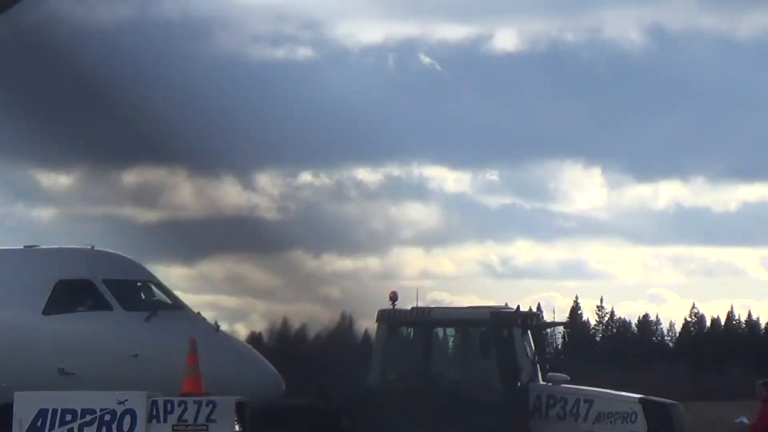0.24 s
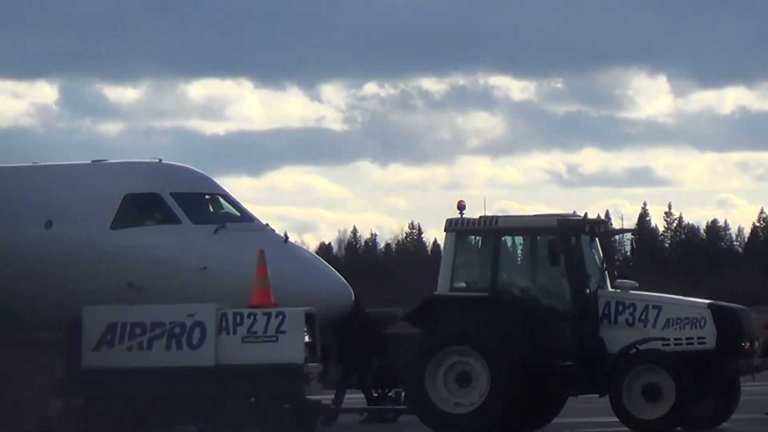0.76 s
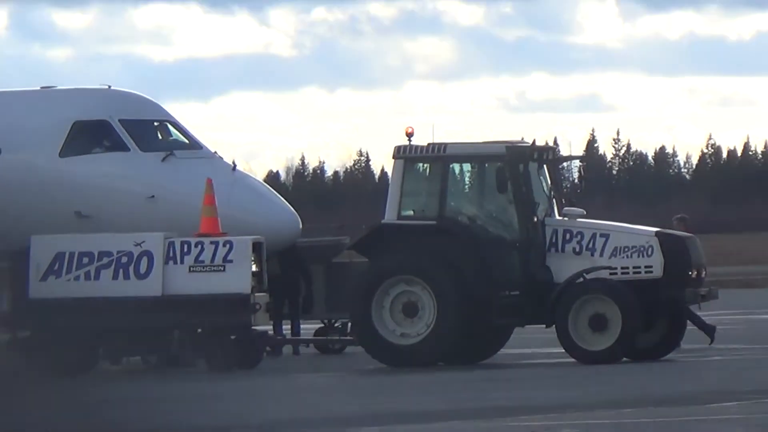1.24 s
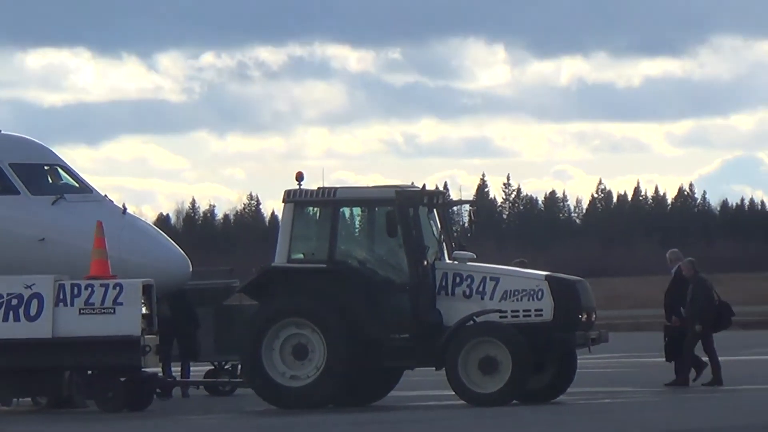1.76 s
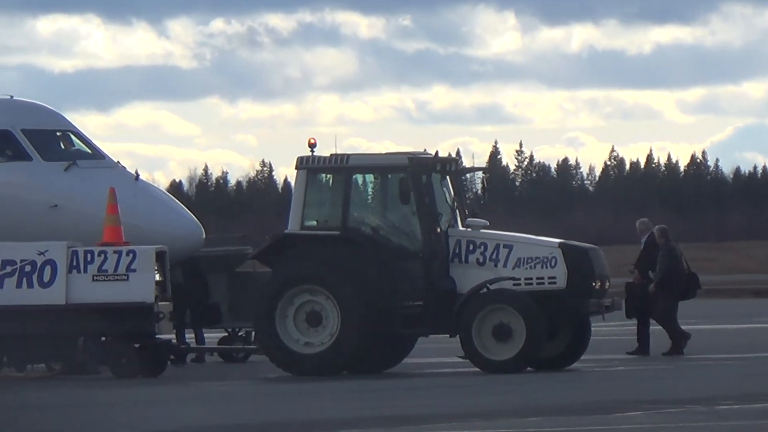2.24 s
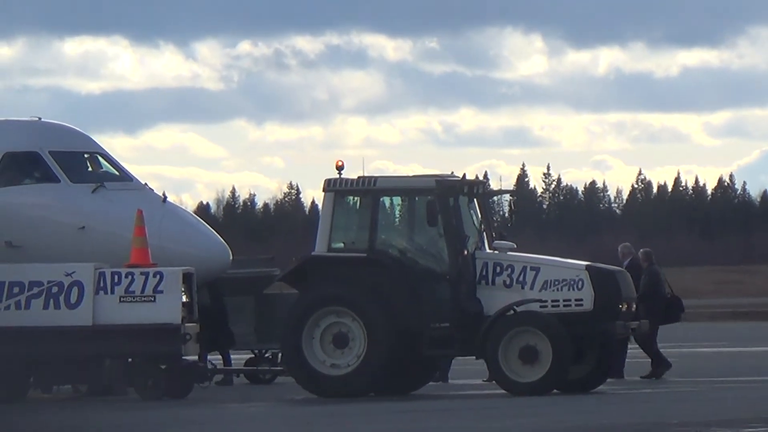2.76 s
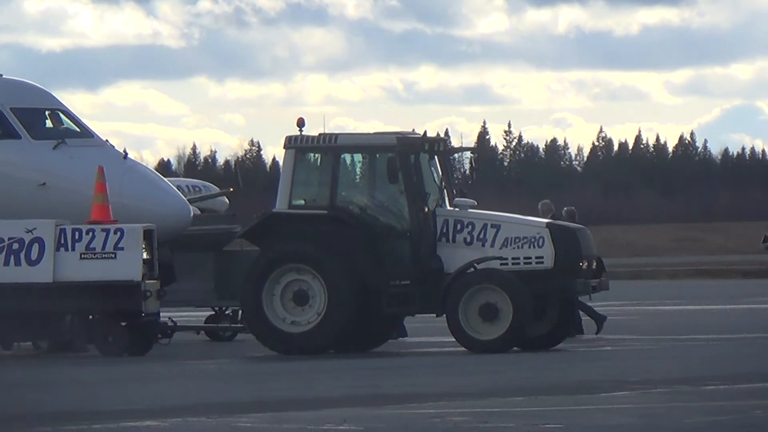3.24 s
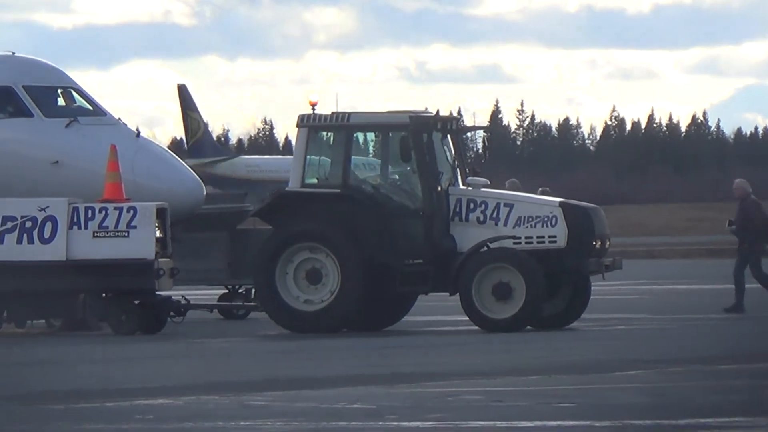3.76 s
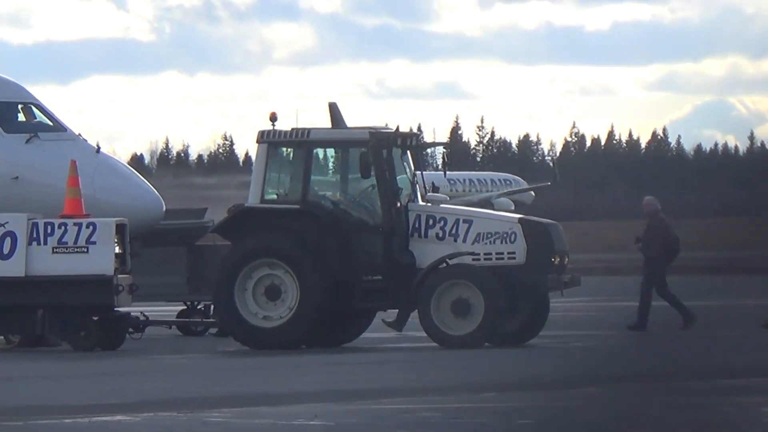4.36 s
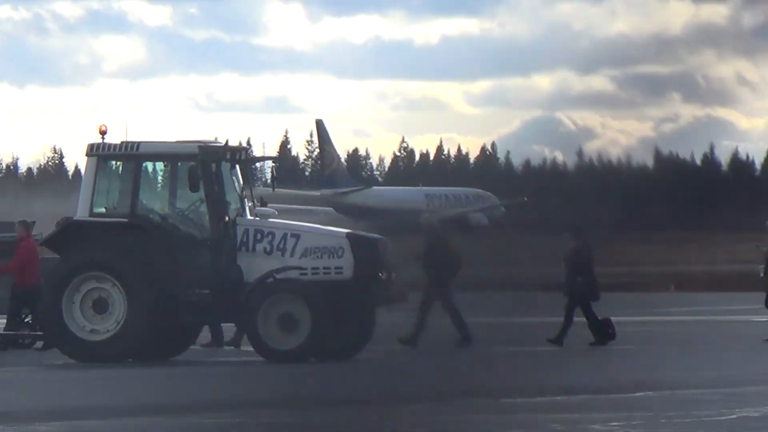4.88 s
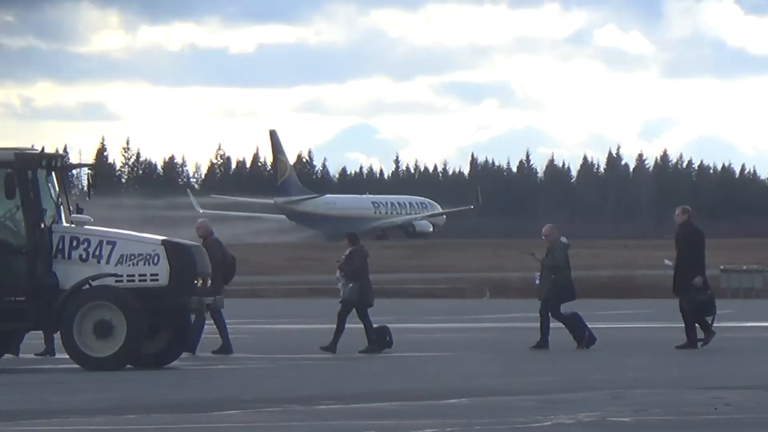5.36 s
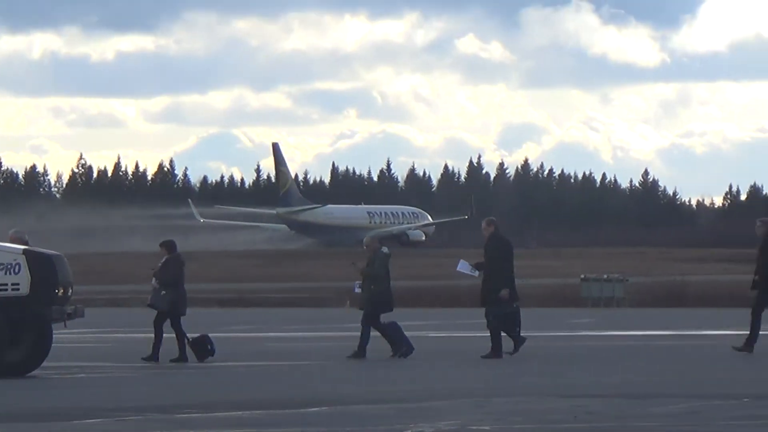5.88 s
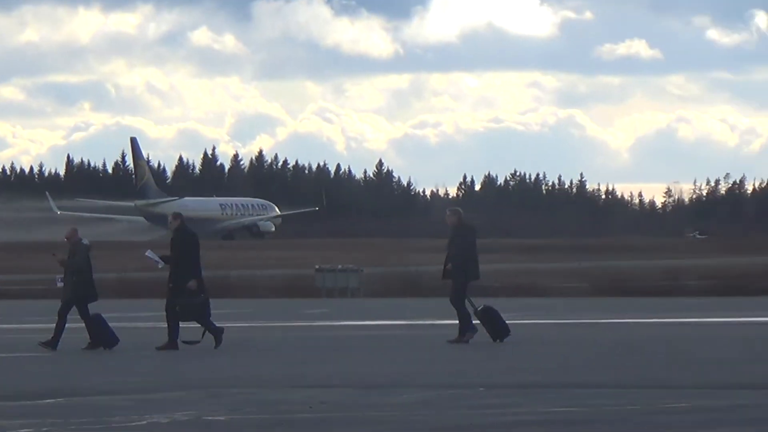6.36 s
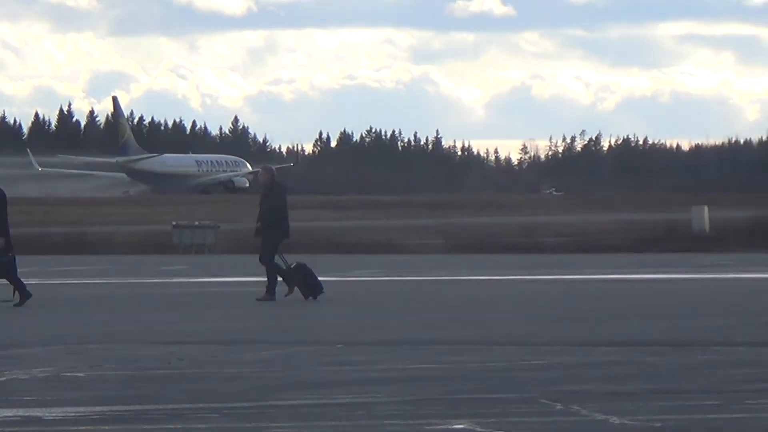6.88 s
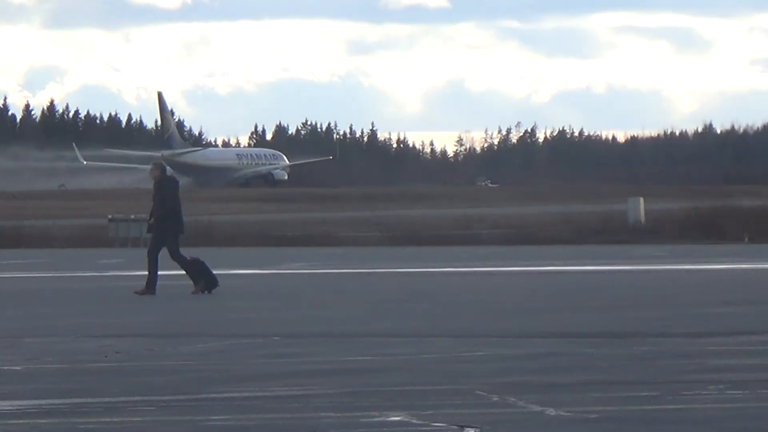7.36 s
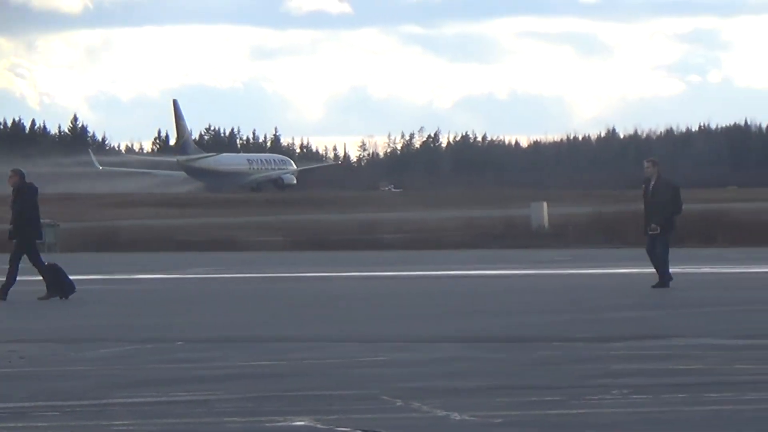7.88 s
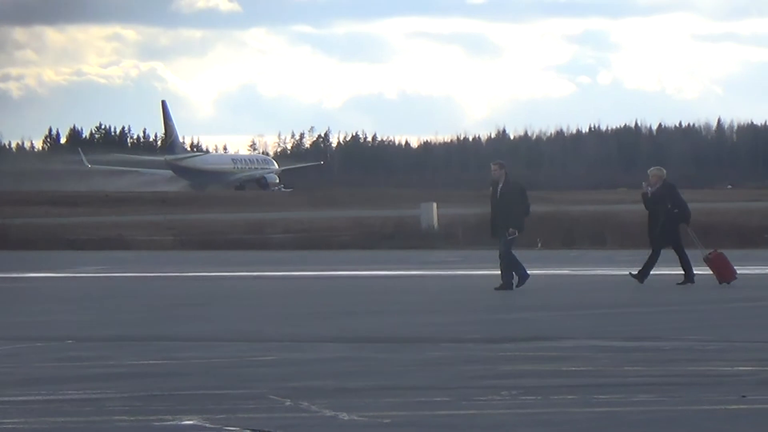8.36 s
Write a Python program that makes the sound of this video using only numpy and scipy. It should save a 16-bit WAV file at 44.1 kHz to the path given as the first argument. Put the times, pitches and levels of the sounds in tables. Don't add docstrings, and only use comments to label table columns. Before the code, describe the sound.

On an open, windy airport apron, a distant jet gives a deep, wavering exhaust rumble and a broad steady roar with faint fan whines. Gusts buffet and pop on the bare stereo microphone, thickest between four and six and a half seconds. Small camera clicks and grip rubs intrude, one hard knock just after five seconds. The low rumble then sinks while the roar stays, with thin hiss behind.

```python
import sys
import numpy as np
from scipy import signal
from scipy.io import wavfile
from scipy.ndimage import uniform_filter1d

SR = 44100
rng = np.random.default_rng(int(sys.argv[2]) if len(sys.argv) > 2 else 0)


def field_ratio(decibels):
    return 10 ** (np.asarray(decibels, dtype=float) / 20)


def transcribe(signal):
    frames = np.atleast_2d(signal).T
    limited = np.clip(frames, -1, 1)
    pcm = np.round(limited * 32767).astype(np.int16)
    wavfile.write(sys.argv[1], SR, pcm)


N = 380141

# [t/s, level/dB, lean towards small eddies/dB]
RUMBLE = [(0, -19.5, 4), (.5, -17, 0.5), (.95, -16, -3), (1.5, -20, 2.5), (1.8, -18, 0), (2.0, -23, -4),
          (2.4, -16.5, -6), (3.0, -15.5, -5), (4.1, -17.5, -1), (4.5, -15.5, -6), (4.72, -19.5, -1),
          (5.05, -20.5, -1.5), (5.3, -17, -4.5), (5.5, -20, -3), (5.9, -18.5, -5), (6.6, -23, 1),
          (6.95, -29, 1), (8.1, -25.5, -3.5)]
# [f/Hz, level/dB]
RUMBLE_COLOUR = [(15, -58), (35, -26.5), (55, -5.5), (88, 0.5), (130, -4), (200, -9), (260, -18),
                 (340, -34.5), (500, -55), (2000, -120)]
# [f/Hz, level/dB]
DEEP_COLOUR = [(8, -44), (20, -23), (32, -2), (42, 0), (60, -10), (90, -38), (400, -120)]
# [t/s, level/dB, clarity of the air/dB]
ROAR = [(0, -33.5, 0.5), (1.0, -32, 0), (1.8, -32, -.5), (2.4, -31, 2), (3.0, -31, -.5), (3.7, -30.5, -4),
        (4.7, -33, -3), (5.64, -34.5, -7), (6.5, -32, -7), (7.7, -32.5, -.5), (8.62, -31.5, -3)]
# [f/Hz, level/dB]
ROAR_COLOUR = [(100, -5.5), (300, -5), (600, 0.5), (1000, -3), (1500, -5.5), (2200, -13), (3000, -17.5),
               (4000, -25), (6000, -36), (10000, -43.5), (12000, -63), (16000, -81.5)]
# [f/Hz, level/dB]
SCATTER_COLOUR = [(100, -8), (300, -1), (600, 3), (1000, 2), (1500, -2.5), (2200, -10), (3000, -15),
                  (4000, -21), (6000, -30), (10000, -44), (16000, -69)]
FANS_HZ = (598, 1378, 1437, 1518, 2450, 2756, 2730, 3470, 5593)
# [width/Hz, level/dB, extra level while winding down/dB]
FANS = [(8, -44.5, 0), (6, -51.5, 0), (5, -56.5, 0), (5, -57, 0), (30, -68, 0), (20, -58.5, 0),
        (120, -53.5, 0), (60, -66, 13), (8, -77, 0)]
# [f/Hz, level/dB]
HISS_COLOUR = [(1000, -10), (4000, 7.5), (6000, 3), (9000, 2.5), (12000, 0.5), (16000, -4)]
# [share of a field, level/dB]
SCAN_STEPS = [(0, -5.5), (.19, -1), (.23, -9), (.41, -7), (.44, 1), (.56, 4.5), (.66, 3), (.8, 0), (1, 0)]
# [t/s, level/dB]
GAIN = [(0, -3.5), (1.1, -2.5), (1.6, -.5), (2.4, .5), (5.5, 0), (6.5, 2), (8.62, 2)]
# [centre t/s, length/s, strength/dB, reach to both ports/dB]
GUSTS = [(0.02, .1, -36, 5), (.53, .13, -29, -11), (1.0, .12, -33, -7), (1.27, .2, -26.5, -7),
         (1.57, .14, -34, -9), (2.17, .22, -34, -4), (2.63, .22, -26, -7), (2.97, .2, -38, 2),
         (3.52, .15, -38, 5), (4.12, .1, -34, -5), (4.38, .16, -27, -10), (4.58, .1, -26, -12),
         (4.87, .26, -29.5, -8), (5.11, .14, -24.5, 0), (5.31, .22, -25, -5), (5.48, .2, -28, 1),
         (5.79, .17, -29.5, -9), (5.955, .17, -25.5, 0), (6.18, .18, -33, -5), (6.35, .12, -33, -5),
         (6.55, .35, -38, -2), (7.75, .2, -38, 4), (3.85, .15, -40, 7), (8.5, .1, -42, 3)]
# [f/Hz, level/dB]
GUST_COLOUR = [(30, -30), (80, -6), (160, 2), (250, -1.5), (350, -9.5), (500, -25.5), (750, -36),
               (1200, -58), (4000, -120)]
# [t/s, length/s, level/dB, centre f/Hz]
RUBS = [(.3, 1.1, -67, 9300), (1.95, 1.5, -68, 9300), (1.0, .08, -65, 9000), (6.1, 0.27, -72, 10000),
        (6.45, .25, -67, 9000), (7.41, .04, -62, 10000), (7.46, 0.079, -59, 10500), (7.64, .04, -59, 9800),
        (7.92, .07, -63, 9000), (8.01, .04, -61, 10000), (8.12, .03, -57, 11000), (8.528, .03, -58, 8500),
        (8.525, .03, -53, 5000)]
# [from t/s, to t/s]
SHIFTS = [
    (.3, 1.5),
    (2.0, 3.0),
    (5.95, 8.62),
]
# [t/s, peak level/dB, pan/dB, centre f/Hz]
TICKS = [(.395, -39, -2, 6000), (.667, -42, 0, 9000), (1.3, -45, 0, 9000), (2.09, -44, 0, 11000),
         (2.65, -44, -2, 12000), (3.4, -43, 0, 11500), (4.066, -35, -6, 4600), (4.685, -30.5, -6, 4100),
         (5.103, -24, -5, 10200), (5.1033, -30.5, -1.5, 4500), (5.2844, -44, -1, 7300),
         (5.3054, -44, 1.5, 8000), (5.3322, -17.5, 1, 5600), (5.3324, -27, -.5, 10300),
         (5.404, -28, -2, 9700), (5.405, -32, -.5, 4500), (6.229, -47, 0, 11500), (6.469, -43, .5, 9000),
         (6.829, -36, -5, 4500), (7.31, -36, -6, 5800), (7.522, -40, -1, 8500), (8.311, -35, -3, 10000),
         (8.454, -42, -3, 9500), (8.528, -35, -2, 7000)]
# [f/Hz, level/dB, t60/s]
SHELL_MODES = [(2120, 4, .016), (2600, 5, .016), (3400, 4, 0.013), (3850, -14, .012), (4620, 3, 0.011),
               (5900, 3, 0.012), (6330, -2, .02), (7480, -4, 0.011), (8800, -6, .01)]
# [t/s, peak level/dB, direction]
POPS = [(0.9693, -9, 1.0), (1.2528, -9.8, -1.0), (1.592, -11, 1.0), (2.716, -10, -1.0), (3.251, -17, 1.0),
        (3.7924, -17.7, -1.0), (4.3183, -8.3, 1.0), (4.4214, -8.3, 1.0), (4.8072, -10.2, 1.0),
        (5.2346, -6.3, 1.0), (5.3593, -10, -1.0), (5.6003, -12.0, -1.0), (5.721, -12, 1.0),
        (5.7798, -6, 1.0), (5.8954, -12.9, -1.0), (6.179, -10, -1.0), (6.349, -1, -1.0),
        (6.7383, -17, -1.0), (6.9172, -21, 1.0), (6.9817, -20.4, -1.0), (7.7094, -18.5, -1.0),
        (7.8711, -22, -1.0), (8.207, -16.0, 1.0), (8.4863, -19.2, 1.0)]

FRAME = 1024
TAIL_ON_S, TAIL_TURN_S = 2.2, .3
THROB_DB, THROB_GAIN_DB = -37.5, 6.5
FACING_S, FACING_TURN_S = 1.5, .35
WIDE_DB, NARROW_DB = -6.5, -9.9
ECHO_HZ, ECHO_SHARE = 687, 0.29
WIND_DOWN_S = .7
HISS_DB, HISS_FOLLOWS = -68.5, .8
SCAN_DB, SCAN_HZ, FIELD_HZ = -65, 15625, 50
EDGE_SHARPNESS = 2.8
LULL_DB, LULL_FOLLOWS, LULL_SHARED_DB = -43, .5, -37
CREAKS_PER_S, CREAK_DB, CREAK_HZ = 22, -53, 9500
TICK_T60_S, TICK_T60_PER_DB = .009, .0003
BAND_EDGE_HZ = 15770


def evened(x):
    return x / np.sqrt(np.mean(x ** 2) + 1e-20)


def colour(points, hz):
    f, value = np.transpose(points)
    return np.interp(np.log(hz + 1), np.log(f + 1), value)


def curves(rows, t):
    s, *columns = np.transpose(rows)
    return [np.interp(t, s, c) for c in columns]


def ease(t, at_s, over_s):
    return (1 + np.tanh((t - at_s) / over_s)) / 2


def add(mix, s, sound):
    part = mix[..., round(s * SR):][..., :sound.shape[-1]]
    part += sound[..., :part.shape[-1]]


def frame_grid(size):
    hop = size // 4
    return np.arange(N // hop + 5) * hop / SR, np.fft.rfftfreq(size, 1 / SR)


def noise(field_db, patchy_db, size):
    t, hz = frame_grid(size)
    real, imag, patches = rng.standard_normal((len(t), len(hz), 3)).T
    patches = uniform_filter1d(patches, size=size // 100, axis=0)
    patches = evened(uniform_filter1d(patches, size=12, axis=1))
    spectra = (real + 1j * imag) * field_ratio(field_db + patchy_db * patches)
    x = signal.istft(spectra, nperseg=size, noverlap=3 * size // 4)[1][:N]
    return x / np.sqrt(3 / 4 * len(hz))


def shape(points, hz, lo_hz, hi_hz):
    db = colour(points, hz)
    inside = (hz >= lo_hz) & (hz < hi_hz)
    return (db - 10 * np.log10(np.sum(field_ratio(db[inside]) ** 2) / len(hz)))[:, None]


def noise_band(x, lo_hz, hi_hz):
    return signal.lfilter(*signal.butter(2, [lo_hz, hi_hz], "band", fs=SR), x)


def ports(shared, opposed):
    return np.array([shared + opposed, shared - opposed])


def rumble():
    t, hz = frame_grid(size=2048)
    level_db, upper_db = curves(RUMBLE, t)
    upper = np.clip((hz[:, None] - 90) / 50, 0, 1)
    top = np.clip((hz[:, None] - 170) / 110, 0, 1)
    eddies_db = shape(RUMBLE_COLOUR, hz, 45, 110) + level_db + upper * (upper_db + 1.8)
    throb_db = THROB_DB + THROB_GAIN_DB * ease(t, TAIL_ON_S, TAIL_TURN_S)
    deep_db = shape(DEEP_COLOUR, hz, 20, 45) + throb_db
    field_db = 10 * np.log10(field_ratio(2 * eddies_db) + field_ratio(2 * deep_db))
    shared = noise(field_db, patchy_db=0.0, size=2048)
    opposed = noise(field_db - 12.0 + 3.8 * upper + 3.5 * top, patchy_db=1.0, size=2048)
    return ports(shared, opposed - .16 * shared)


def roar():
    t, hz = frame_grid(size=FRAME)
    level_db, clear_db = curves(ROAR, t)
    width_db = WIDE_DB + (NARROW_DB - WIDE_DB) * ease(t, FACING_S, FACING_TURN_S)
    echo = ECHO_SHARE * np.exp(2j * np.pi * hz / ECHO_HZ - hz / 9000)
    comb_db = 20 * np.log10(abs(1 + echo))
    treble = np.clip((hz[:, None] - 2300) / 1500, 0, 1)
    direct_db = shape(ROAR_COLOUR, hz, 500, 2500) + comb_db[:, None] + level_db - .6
    direct_db = direct_db + treble * clear_db
    scatter_db = shape(SCATTER_COLOUR, hz, 500, 2500) + level_db + width_db
    scatter_db = scatter_db + treble * (.25 * clear_db - 1.2 - .6 * (width_db - NARROW_DB))
    direct = noise(direct_db, patchy_db=0.41, size=FRAME)
    scatter = noise(scatter_db, patchy_db=1.3, size=FRAME)
    return ports(direct, scatter)


def whines():
    t, out = np.arange(N) / SR, np.zeros(N)
    for hz, (width, db, extra_db) in zip(FANS_HZ, FANS):
        pole = np.exp(-np.pi * width / SR)
        drive = rng.standard_normal(N) + 1j * rng.standard_normal(N)
        wander = signal.lfilter([1], [1, -pole], drive)
        tone = evened((wander * np.exp(2j * np.pi * hz * t)).real)
        out += field_ratio(db + extra_db * np.exp(-(t / WIND_DOWN_S) ** 2)) * tone
    return ports(out, 0.12 * out)


def electronics():
    t, hz = frame_grid(size=FRAME)
    hiss_db = shape(HISS_COLOUR, hz, 11100, 15250) + HISS_DB + HISS_FOLLOWS * curves(GAIN, t)[0]
    hiss = noise(hiss_db, patchy_db=0.5, size=FRAME)
    s = np.arange(N) / SR
    whistle_db = curves(SCAN_STEPS, s * FIELD_HZ % 1)[0] + SCAN_DB + curves(GAIN, s)[0]
    return hiss + field_ratio(whistle_db) * np.sin(2 * np.pi * SCAN_HZ * s)


def gusts(t):
    s, length, db, reach_db = np.transpose(GUSTS)[..., None]
    bell = field_ratio(2 * db) * np.exp(-abs(2.3 * (t - s) / length) ** EDGE_SHARPNESS)
    lull = field_ratio(2 * (LULL_DB + LULL_FOLLOWS * (curves(RUMBLE, t)[0] + 20)))
    shared = field_ratio(2 * LULL_SHARED_DB) + (bell * field_ratio(2 * reach_db)).sum(0)
    return 10 * np.log10(lull + bell.sum(0)), 10 * np.log10(shared)


def buffeting():
    t, hz = frame_grid(size=512)
    opposed_db, shared_db = gusts(t)
    lumps_db = 1.7 * evened(uniform_filter1d(rng.standard_normal(len(t)), size=5))
    base_db = shape(GUST_COLOUR, hz, 250, 550) + lumps_db
    octaves = np.log2((hz[:, None] + 1) / 90)
    reach = np.clip(octaves, .2, 2.5) * 0.63
    opposed = noise(base_db - 32 + reach * (opposed_db + 31.5) * 1.4, patchy_db=-0.5, size=512)
    cavity_db = -9 * np.log2((hz[:, None] + 1) / 310) ** 2
    shared = noise(base_db + cavity_db - 31.5 + (shared_db + 31) * 1.37, patchy_db=1.5, size=512)
    return ports(shared, opposed)


def rubs():
    out = np.zeros((2, N))
    for s, length, db, hz in RUBS:
        count = round(length * SR)
        grain_db = 2.8 * evened(uniform_filter1d(rng.standard_normal(count), size=90))
        grit = rng.standard_normal(count) * field_ratio(grain_db)
        rub = evened(noise_band(grit, 0.78 * hz, 1.17 * hz)) * signal.windows.tukey(count, .6)
        add(out, s, field_ratio(db) * rub * np.ones((2, 1)))
    return out


def creaks():
    t, u = np.arange(N) / SR, np.arange(300) / SR
    busy = sum((t > a) & (t < b) for a, b in SHIFTS)
    size = field_ratio(3.0 * np.minimum(rng.exponential(1, N), 3))
    slips = size * (rng.random(N) < busy * CREAKS_PER_S / SR)
    grain = np.minimum(u / .0012, 1) * field_ratio(-60 * u / .012)
    flare = signal.oaconvolve(slips, grain)[:N]
    band = noise_band(rng.standard_normal(N), .75 * CREAK_HZ, 1.25 * CREAK_HZ)
    grains = field_ratio(CREAK_DB) * flare * band
    return ports(grains, -.15 * grains)


def ticks():
    out, t = np.zeros((2, N)), np.arange(1500) / SR
    shell = sum(field_ratio(db - 60 * t / t60) * np.sin(2 * np.pi * hz * t) for hz, db, t60 in SHELL_MODES)
    for s, db, pan_db, hz in TICKS:
        t60 = np.clip(TICK_T60_S - TICK_T60_PER_DB * (db + 20), .003, .1)
        attack_s = .0002 + 0.0017 * (hz > 8000)
        puff = noise_band(rng.standard_normal((2, len(t))), 0.76 * hz, min(1.17 * hz, 13500))
        puff = puff[0] + .9 * puff
        puff = puff * field_ratio(-60 * t / t60) * np.minimum(t / attack_s, 1)
        hard = np.clip((db + 23) / 8, 0, 1)
        tick = puff / abs(puff).max() + 3.4 * hard * shell / abs(shell).max()
        add(out, s + 0.00114, field_ratio(db + np.array([[pan_db], [-pan_db]]) / 2) * tick)
    return out


def pops():
    half = 300
    u = np.arange(-half, half) / 30
    pop = np.exp(-u ** 2 / 2) - .3 * np.exp(-u ** 2 / 18)
    out = np.zeros(N)
    for s, db, direction in POPS:
        add(out, s - half / SR, np.sign(direction) * field_ratio(db + 2.5) * pop)
    return ports(-0.11 * out, out)


def scene():
    jet = rumble() + roar() + whines()
    wind = buffeting() + pops()
    hands = rubs() + creaks() + ticks()
    return jet + wind + hands


def top_cut(x):
    return signal.sosfilt(signal.butter(12, 16480, fs=SR, output="sos"), x)


def record(dry):
    heard = np.tanh(dry) + electronics()
    heard = heard * signal.windows.tukey(N, 60 / N)
    edge = signal.firwin(1023, BAND_EDGE_HZ, window=("kaiser", 2.5), fs=SR)
    padded = np.pad(heard, ((0, 0), (511, 511)), "reflect", reflect_type="odd")
    mix = signal.oaconvolve(padded, edge[None], "valid")
    return top_cut(mix)


dry = scene()
out = record(dry)
transcribe(out)
```